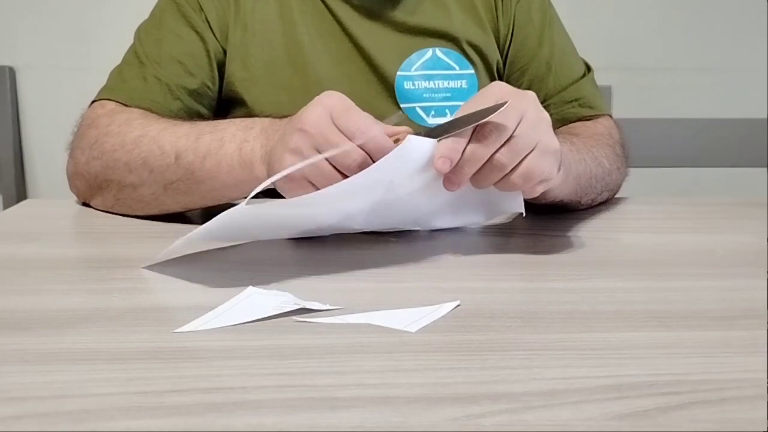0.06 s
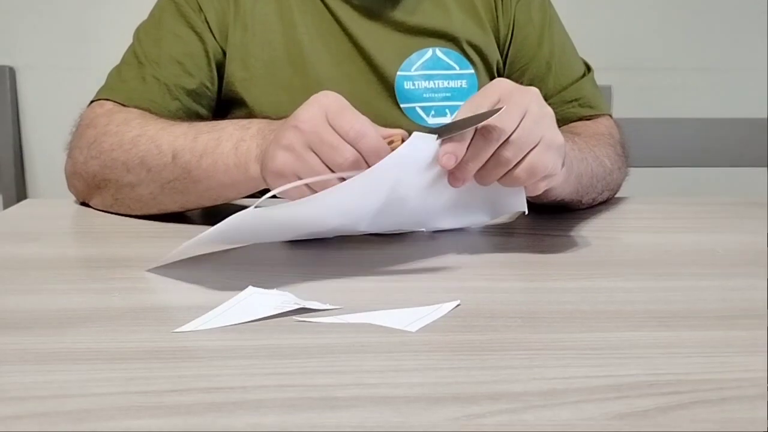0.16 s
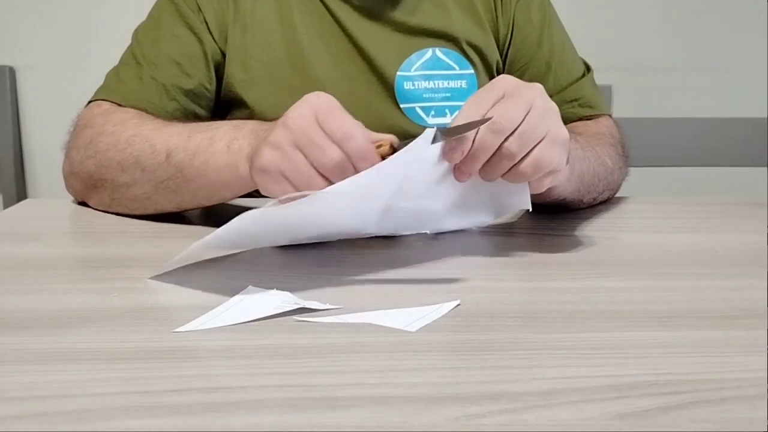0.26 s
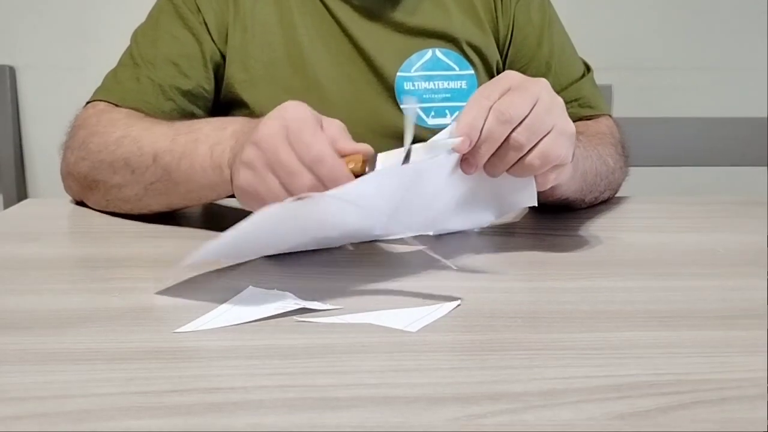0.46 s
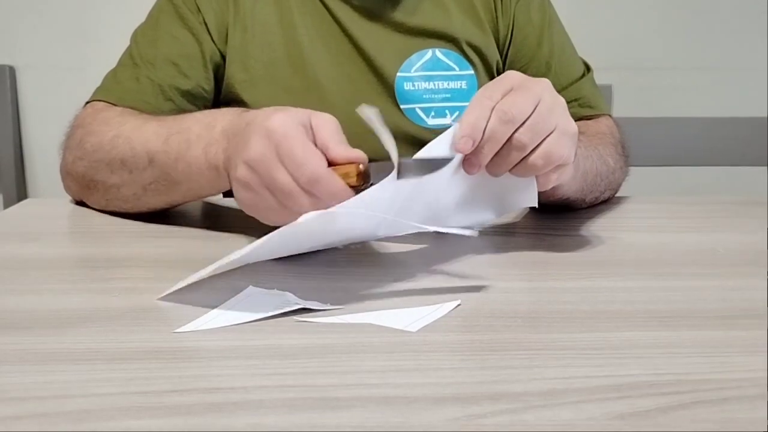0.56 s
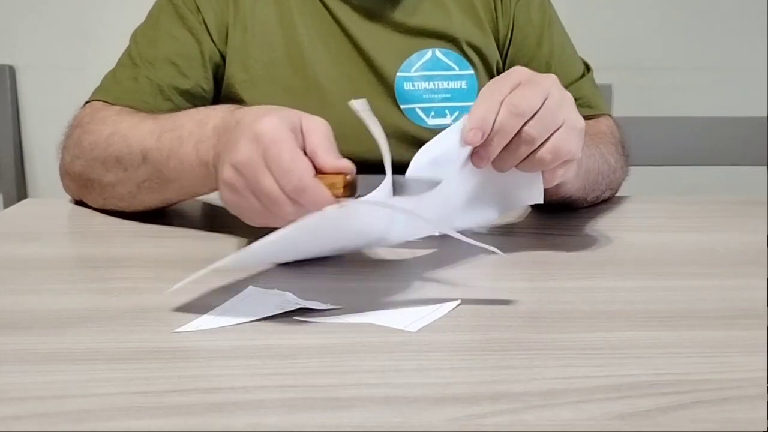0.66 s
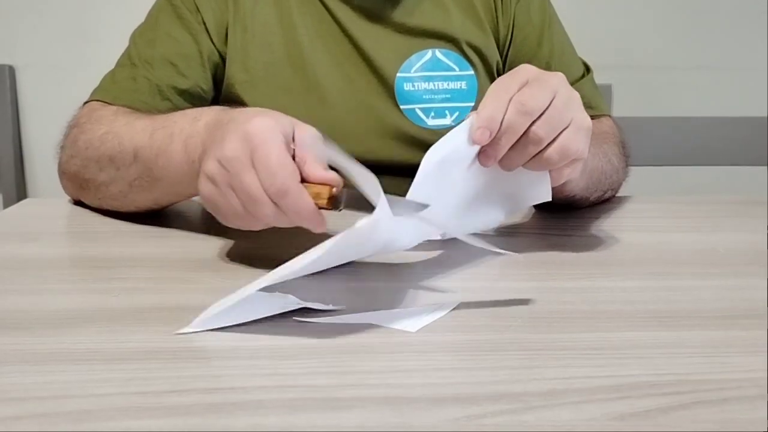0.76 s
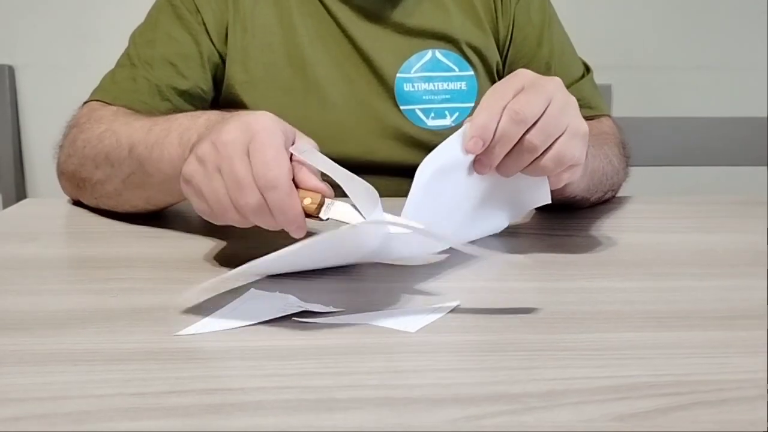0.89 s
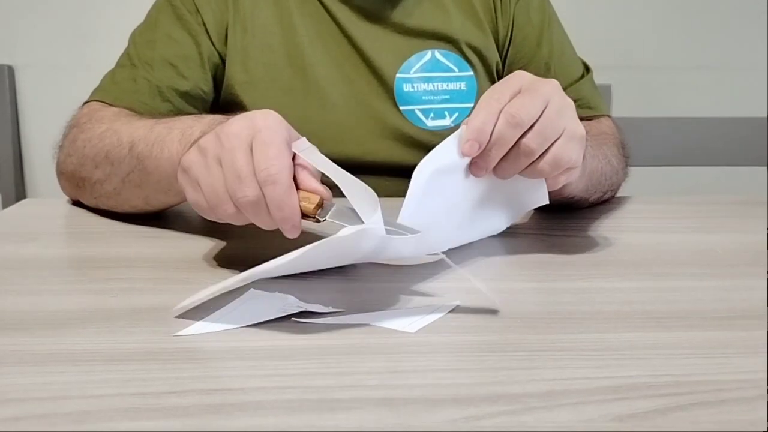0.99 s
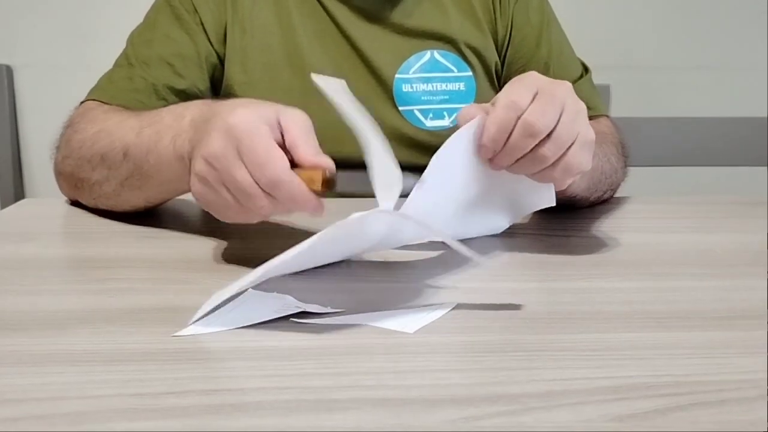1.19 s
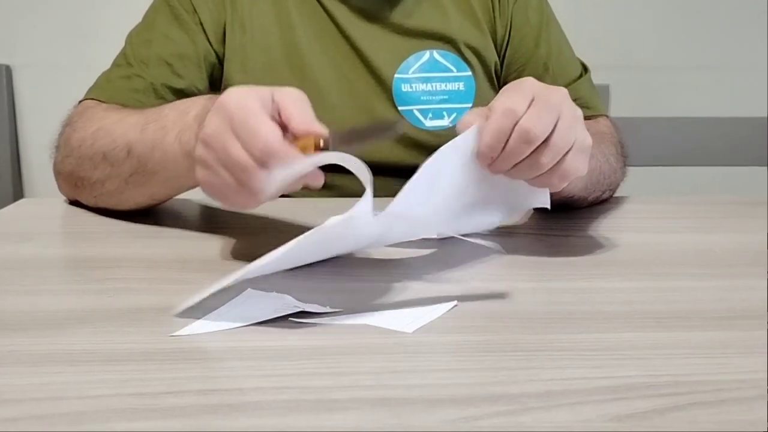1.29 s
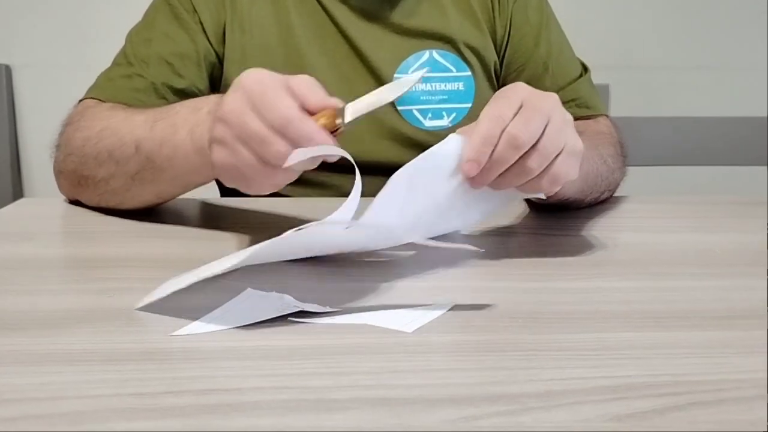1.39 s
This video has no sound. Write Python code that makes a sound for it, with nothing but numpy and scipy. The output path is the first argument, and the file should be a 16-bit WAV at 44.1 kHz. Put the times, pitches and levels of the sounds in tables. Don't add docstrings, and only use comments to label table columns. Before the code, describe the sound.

Paper is sliced by a sharp blade, close up in a small quiet room. After faint grip rustling, a thin bright hiss starts at 0.2 s, swells to a fuller grainy rip near 0.4, dips around 0.7, then surges strongest at 0.85. A crisp snap with a short papery thud hits at 1.03. Rustling fades, soft table taps come at 1.24-1.3, then fingers slide with a fine hiss until the end.

```python
import sys
import numpy as np
from scipy import signal
from scipy.fft import rfft, irfft
from scipy.io import wavfile

SR = 44100
rng = np.random.default_rng(int(sys.argv[2]) if len(sys.argv) > 2 else 0)


def rack_gain(trim_db):
    fader = np.asarray(trim_db, float)
    return 10 ** (fader / 20)


def log_audio(samples):
    frames = np.atleast_2d(samples).T
    limited = np.clip(frames, -1, 1)
    pcm = np.round(limited * 32767).astype(np.int16)
    wavfile.write(sys.argv[1], SR, pcm)


N = 63945

# frequency in Hz, level in dB per Hz.
FLOOR_SPECTRUM = [(35, -43), (60, -29), (123, -12.5), (209, -13), (577, -21.5), (2980, -19), (15000, -32.5)]
# frequency in Hz, share of power common to both (0 to 1).
SHARED_POWER = [(150, 0.95), (800, 1), (1800, 0.069), (3600, 0.57), (6000, 0.12), (9000, 0.053),
                (15000, 0.72)]
# frequency in Hz, width in Hz, boost in dB.
LEFT_PORT = [(3740, 1230, 5), (6690, 2200, 5), (15020, 980, 10), (4750, 1320, -3)]
RIGHT_PORT = [(3690, 126, -19.5), (5230, 1860, 3.5), (8100, 910, 2.5), (14300, 15000, -6)]

# middle in seconds, length in seconds, level in dB.
FLAPS = [
    (0.397, 0.025, -62),
    (0.586, 0.016, -74),
    (0.892, 0.029, -41.5),
    (0.95, 0.013, -46.5),
    (1.277, 0.067, -70),
]
# frequency in Hz, level in dB per Hz.
FLAP_SPECTRUM = [(60, -13), (110, -18), (180, 6.5), (300, 2.5), (450, 12), (1000, -49)]

# time in seconds, peak in dB, softness in seconds.
TOUCHES = [
    (1.2414, -28.5, 0.000093),
    (1.294, -27, 0.00053),
    (1.343, -41, 0.00032),
]
# frequency in Hz, level in dB, T60 in seconds.
TABLE_MODES = [(241, -24.5, 0.098), (289, -18, 0.14), (402, -12, .015), (703, -13, 0.047),
               (1260, -5.5, 0.013)]

# time in seconds, level in dB.
GRIP_SHIFT = [(0, -67), (.015, -61.5), (.027, -69), (.036, -56), (.046, -71), (.054, -60.5), (.07, -71),
              (.15, -102), (.192, -67)]
# time in seconds, level in dB.
FINGER_SLIDE = [(1.222, -85), (1.232, -63), (1.255, -56), (1.31, -61), (1.328, -57), (1.345, -49),
                (1.375, -43), (1.425, -43), (1.449, -46)]
# frequency in Hz, level in dB per Hz.
GRIP_SPECTRUM = [(1500, -31), (3000, -9), (4500, -8.5), (6500, -1), (8000, -11), (10000, -11.5),
                 (15000, -14)]
SLIDE_SPECTRUM = [(1000, -22.5), (2400, -15.5), (3600, -6), (5000, -12.5), (6500, -6), (8500, -2),
                  (10000, -2), (15000, -7)]

# start in seconds, attack in seconds, peak in dB, T60 in seconds.
RUSTLES = [
    (1.036, 0.012, -35, 0.44),
    (1.425, 0.0063, -57.5, 0.24),
]
# start in seconds, attack in seconds, peak in dB, T60 in seconds.
SETTLES = [
    (1.244, 0.0039, -49.5, 0.16),
    (1.282, 0.018, -53.5, 0.099),
    (1.335, 0.0083, -55.5, 0.046),
]
# frequency in Hz, level in dB per Hz.
RUSTLE_SPECTRUM = [(100, -33), (300, -5.5), (700, -13), (1500, -3.5), (2400, 4.5), (3500, -3.5),
                   (5000, -13), (9000, -29)]
# frequency in Hz, width in Hz, boost in dB.
RUSTLE_MODES = [(360, 68, 12.5), (1100, 180, 7), (1630, 84, 10.5), (2340, 550, 1.5)]
# frequency in Hz, width in Hz.
FREED_STRIP_MODES = [(2280, 120), (2470, 80)]

# time in seconds, peak in dB, length in seconds, crack share in dB, thud share in dB.
SNAPS = [
    (1.0246, -15, 0.0094, -30, -11),
    (1.0303, -5.5, 0.0024, 4, -6),
    (1.2254, -46.5, 0.0019, 22.5, -17),
    (1.2410, -31.5, 0.0021, 10.5, 2),
    (1.0326, -8, 0.0013, -25, -4.5),
    (1.04, -42.5, 0.0015, -9.5, 2),
]
# frequency in Hz, left level in dB, right level in dB, T60 in seconds.
STRIP_MODES = [(934, -10, -13.5, 0.015), (1630, -52, -15.5, 0.028), (2470, -28, -7, 0.038),
               (3240, 3.5, -22, 0.0022), (3870, -17.5, -5, 0.0044)]
# frequency in Hz, left level in dB, right level in dB, T60 in seconds.
CRACK_MODES = [(5400, -8.5, -20, 0.0038), (6700, -10.5, -37, 0.0025), (7630, -10, -28, 0.0061),
               (10860, -38, -14, 0.0031)]
# frequency in Hz, level in dB, T60 in seconds.
THUD_MODES = [(123.6, -10.5, 0.1), (390, 1.5, 0.033), (707, 6, 0.068), (1184, -1, 0.053)]

# time in seconds, blade force in dB, edge brightness in dB, sheet shake in dB.
CUT = [(.193, -75, 6, 0), (.197, -50, 9, 4), (.226, -42, 7, 2), (.31, -37, 1, -2), (.345, -32, 0, 1),
       (.398, -27, -3, -6), (.47, -31, 2, 2), (.55, -32, 1, 1), (.612, -37, 2, 4), (.692, -39, 0, 6),
       (.716, -31.5, -2, 0), (.79, -30, 3, -2), (.855, -24.5, 1, -2), (.862, -32, -1, 3), (.89, -32, -3, 0),
       (.918, -32, 2, 1), (.95, -38, 0, 2), (1.022, -46, -9, -3)]
# time in seconds, body ring in dB, lower edge ring in dB, upper edge ring in dB.
BEND = [(.19, -1, 12, -16), (.3, 1.5, 5, -17), (.36, 1, 1.5, -21), (.395, 0, 1.5, -15), (.46, 0, 3, -20),
        (.5, -2.5, -4, -20), (.545, 0, 9.5, -7), (.63, -3, -23, -15), (.70, -1.5, -29, 3),
        (.76, 2, -18, 11.5), (.79, -1, 7.5, 1), (.856, 4.5, 10, 6), (.866, -2, -21, -15), (.91, 2, -9, 5),
        (.96, -1, -13, -6), (1.03, -2, -10, -6)]
# time in seconds, surge in dB, length in seconds.
SURGES = [(0.218, 0.5, 0.0017), (0.223, 2.5, 0.0016), (0.343, 4, 0.001), (0.397, 5.5, 0.003),
          (0.443, 4, 0.0042), (0.452, 5.5, 0.0026), (0.494, 6, 0.0024), (0.559, 2, .003),
          (0.753, 2.5, .003), (0.78, 4.5, .003), (0.798, 5, 0.0042), (0.817, 3, 0.0011),
          (0.826, 5.5, 0.0013), (0.838, 1, 0.0013), (0.85, -3, 0.0046), (0.851, 5.5, 0.0012),
          (0.924, 0, 0.0023)]
# frequency in Hz, level in dB per Hz.
EDGE_SPECTRUM = [(1200, -5.5), (2500, -67), (4000, -2), (7000, -2.5), (8600, -4.5), (9600, -7),
                 (15000, -8.5)]
SHEET_SPECTRUM = [(100, -32.5), (200, -18), (350, 7.5), (500, -13), (750, -5), (1300, -0.5), (2500, -0.5),
                  (4500, -10.5)]
# frequency in Hz, level in dB per Hz.
BODY_SPECTRUM = [(1800, -16), (2950, -9), (3500, 0), (4200, -9), (6000, -22), (12000, -40)]
# frequency in Hz, width in Hz.
EDGE_RINGS = [(6830, 345), (7700, 440)]
# frequency in Hz, width in Hz, boost in dB.
SHEET_MODES = [(359, 140, -7.5), (760, 250, 6), (1360, 200, 1.5), (1626, 60, 5), (2466, 200, 6)]


def rms_one(x):
    return x / np.sqrt(np.mean(x ** 2) + 1e-20)


def in_time(rows):
    s, first, *rest = np.transpose(rows)
    t = np.arange(N) / SR
    return [np.interp(t, s, first, left=-120, right=-120)] + [np.interp(t, s, c) for c in rest]


def at_hz(points, hz):
    points_hz, values = np.transpose(points)
    return np.interp(np.log(hz + 1), np.log(points_hz), values)


def bump(middle_s, length_s):
    return np.exp(-.5 * ((np.arange(N) / SR - middle_s) / length_s) ** 2)


def swell(rows, faster=1):
    t = np.arange(N) / SR
    total = 0
    for s, attack_s, db, t60_s in rows:
        release_db = faster * 60 * np.maximum(t - s - attack_s, 0) / t60_s
        total = total + np.clip((t - s) / attack_s, 0, 1) * rack_gain(db - release_db)
    return total


def drift(rate_hz):
    r = np.exp(-2 * np.pi * rate_hz / SR)
    slow = signal.lfilter([1], [1, -2 * r, r * r], rng.standard_normal(N + SR))[SR:]
    return 2 * np.tanh(rms_one(slow) / 1.8)


def boost(x, peaks):
    for hz, width_hz, db in peaks:
        g, w = rack_gain(db / 2), 2 * np.pi * hz / SR
        a = np.sin(w) * width_hz / hz / 2
        x = signal.lfilter([1 + a * g, -2 * np.cos(w), 1 - a * g], [1 + a / g, -2 * np.cos(w), 1 - a / g], x)
    return x


def resonate(x, hz, width_hz):
    r = np.exp(-np.pi * width_hz / SR)
    zeros = np.array([1, 0, -1]) * (1 - r * r) / 2
    return signal.lfilter(zeros, [1, -2 * r * np.cos(2 * np.pi * hz / SR), r * r], x)


def ring(clicks, hz, t60_s):
    r, w = rack_gain(-60 / (t60_s * SR)), 2 * np.pi * hz / SR
    return signal.lfilter([0, np.sin(w)], [1, -2 * r * np.cos(w), r * r], clicks + 1e-18)


def struck(clicks, modes):
    light = signal.lfilter(*signal.butter(2, modes[0][0] / 2, "high", fs=SR), clicks)
    return sum(rack_gain([[left_db], [right_db]]) * ring(light, hz, t60_s) for hz, left_db, right_db, t60_s in modes)


def grains(per_s, spread_db, clump_db, clumps_per_s, spectrum, tilt_db=0):
    left_lag_s = 0.000099
    born = rng.random((3, N)) < per_s / SR
    sizes = rack_gain(spread_db * np.minimum(rng.exponential(1, (3, N)), 5)) * rng.choice([-1, 1], (3, N))
    both, left, right = rfft(born * sizes * rack_gain(clump_db * drift(clumps_per_s)))
    hz = np.arange(len(both)) * SR / N
    share = np.clip(at_hz(SHARED_POWER, hz), 0, 1)
    late = np.exp(-2j * np.pi * hz * left_lag_s)
    pair = np.sqrt(share) * np.array([both * late, both]) + np.sqrt(1 - share) * np.array([left, right])
    colour_db = at_hz(spectrum, hz) + tilt_db * np.log2((hz + 1) / 1000)
    colour_db = colour_db - 12 * np.log2(np.maximum(spectrum[0][0] / (hz + 1), 1))
    return rms_one(irfft(pair * rack_gain(colour_db), N))


def floor():
    return rack_gain(-69) * grains(17000, 0.91, 3.0, 2.9, FLOOR_SPECTRUM)


def room(x):
    t60_s, wall_cut_hz = 0.27, 26000
    out, dull = np.zeros((2, N)), np.exp(-2 * np.pi * wall_cut_hz / SR)
    for k, lag in enumerate((rng.uniform(.008, .03, 16) * SR).astype(int)):
        loop, gain, state = x.copy(), rack_gain(-60 * lag / SR / t60_s), [0.]
        for i in range(lag, N, lag):
            back, state = signal.lfilter([gain * (1 - dull)], [1, -dull], loop[i - lag:i], zi=state)
            loop[i:i + lag] += back[:N - i]
        out[k % 2] += (loop - x) * (-1) ** (k // 2)
    return out


def flaps():
    wave = sum(rack_gain(db) * bump(s, length_s) for s, length_s, db in FLAPS)
    return wave * grains(2800, 3.9, 3.1, 20, FLAP_SPECTRUM)


def touches():
    table_low_hz = 168
    push = 0
    for s, db, soft_s in TOUCHES:
        press = bump(s + 2 * soft_s, soft_s)
        push = push + rack_gain(db) * press / press.sum()
    push = signal.lfilter(*signal.butter(2, table_low_hz, "high", fs=SR), push)
    return sum(rack_gain(db) * ring(push, hz, t60_s) for hz, db, t60_s in TABLE_MODES)


def slide():
    early_db = in_time(GRIP_SHIFT)[0]
    late_db = in_time(FINGER_SLIDE + [(N / SR, FINGER_SLIDE[-1][1])])[0]
    rasp = rack_gain(early_db) * grains(6600, 0.83, 1.7, 120, GRIP_SPECTRUM)
    return rasp + rack_gain(late_db) * grains(19100, 3.2, 0.74, 60, SLIDE_SPECTRUM)


def rustle():
    top_db, top_faster = -7.5, 2.06
    ring_db, ring_t60_s = -38, .5
    low = swell(RUSTLES) * rms_one(boost(grains(4000, 2, 1.5, 70, RUSTLE_SPECTRUM), RUSTLE_MODES))
    top = rack_gain(top_db) * swell(RUSTLES, top_faster) * grains(7000, 6.4, 1.2, 54, EDGE_SPECTRUM)
    shake = grains(4000, 4.2, 1.0, 46, RUSTLE_SPECTRUM)
    rings = rms_one(sum(ring(shake, hz, 2 / width_hz) for hz, width_hz in FREED_STRIP_MODES))
    rings = swell([(RUSTLES[0][0], .01, ring_db, ring_t60_s)]) * rings
    contact = rms_one(boost(grains(4000, 2, 2, 60, SHEET_SPECTRUM, tilt_db=-4), SHEET_MODES))
    return low + top + rings + swell(SETTLES) * contact


def snaps():
    snap_cut_hz, tear_n = 9300, 600
    strip, crack, thud = np.zeros((3, N))
    for s, db, length_s, crack_db, thud_db in SNAPS:
        at, fade = int(s * SR), np.exp(-np.arange(tear_n) / (length_s * SR))
        run = rack_gain(db) * rng.standard_normal(tear_n) * fade / np.sqrt(np.sum(fade ** 2))
        strip[at:at + tear_n] += run
        crack[at:at + tear_n] += rack_gain(crack_db) * run
        thud[at] = rack_gain(db + thud_db)
    near = struck(strip, STRIP_MODES) + struck(crack, CRACK_MODES)
    near = signal.lfilter(*signal.butter(2, snap_cut_hz, fs=SR), near)
    return near + sum(rack_gain(db - 19) * ring(thud, hz, t60_s) for hz, db, t60_s in THUD_MODES)


def fine_modes(x):
    level_db, width_hz, wander_db, wanders_per_s = -7, 80, 4, 12
    out = 0
    for hz in np.geomspace(500, 9000, num=48) * rng.uniform(.97, 1.03, 48):
        mode = resonate(x, hz, width_hz * max(hz / 2500, 1) ** 1.47)
        weight = np.sqrt(min(hz, 2500) / 1000) * min(2500 / hz, 1) ** 0.21
        out = out + weight * rack_gain(wander_db * drift(wanders_per_s)) * mode
    return x + rack_gain(level_db) * out


def cut():
    fibres = dict(per_s=7100, spread_db=3, clump_db=1.38, clumps_per_s=240)
    force_db, bright_db, shake_db = in_time(CUT)
    body_db, *rings_db = in_time(BEND)
    surge_db = 1.15 * sum(db * bump(s, length_s) for s, db, length_s in SURGES)
    hiss = grains(**fibres, spectrum=EDGE_SPECTRUM)
    edge = hiss
    for db, (hz, width_hz) in zip(rings_db, EDGE_RINGS):
        edge = edge + (rack_gain(db + surge_db) * resonate(hiss, hz, width_hz))
    body = grains(**fibres, spectrum=BODY_SPECTRUM)
    sheet = rms_one(boost(grains(3000, 1.6, 0.95, 33, SHEET_SPECTRUM), SHEET_MODES))
    edge = rack_gain(bright_db + 0.13 * surge_db - 6.5) * edge
    body = rack_gain(body_db + surge_db - 3.5) * body
    return rack_gain(force_db) * (edge + body + rack_gain(shake_db - 3) * sheet)


def scene():
    paper = fine_modes(cut() + rustle() + slide()) + snaps() + touches() + flaps()
    return paper + rack_gain(-15) * room(paper.mean(axis=0)) + floor()


def roll_off(x):
    return signal.sosfilt(signal.butter(12, 16640, fs=SR, output="sos"), x)


def record(dry):
    low_cut_hz, top_cut_hz = 75, 16050
    ports = np.array([rack_gain(-1) * boost(dry[0], LEFT_PORT), rack_gain(-3) * boost(dry[1], RIGHT_PORT)])
    ports = signal.sosfilt(signal.butter(3, low_cut_hz, "high", fs=SR, output="sos"), ports)
    ports = signal.sosfilt(signal.cheby2(12, 60, top_cut_hz, fs=SR, output="sos"), ports)
    return roll_off(ports)


dry = scene()
out = record(dry)
log_audio(out)
```